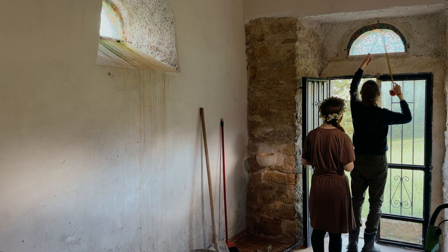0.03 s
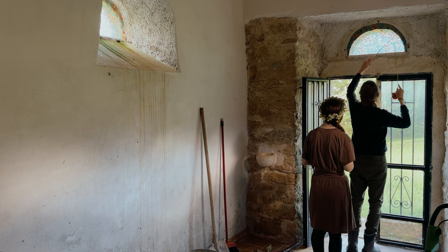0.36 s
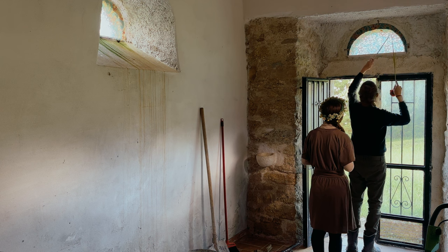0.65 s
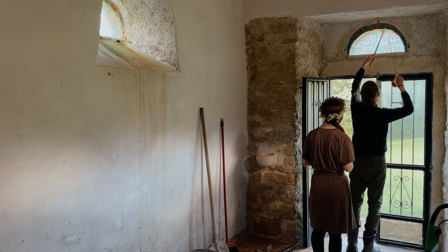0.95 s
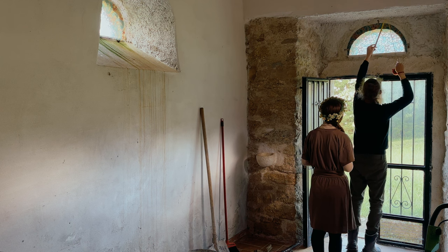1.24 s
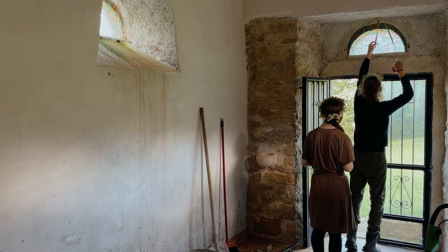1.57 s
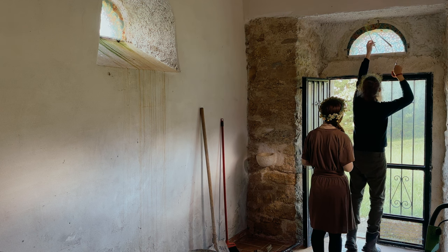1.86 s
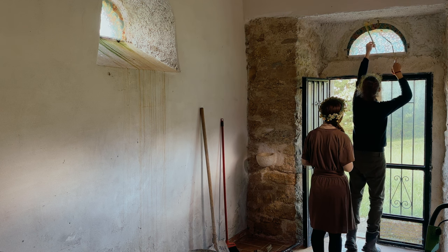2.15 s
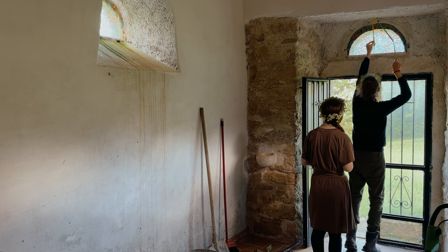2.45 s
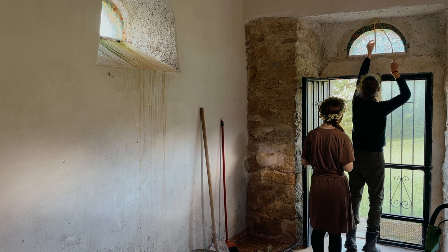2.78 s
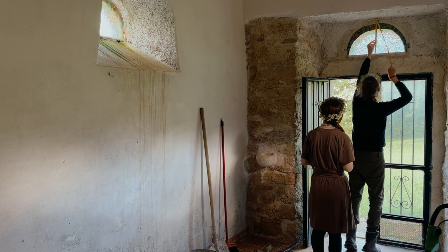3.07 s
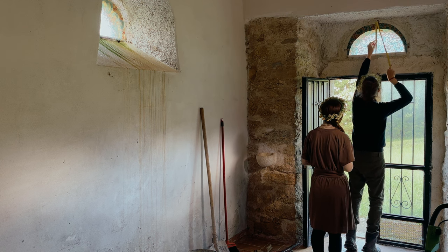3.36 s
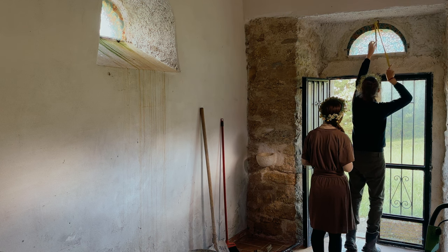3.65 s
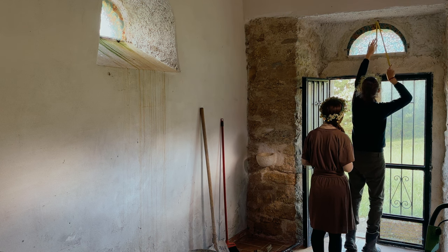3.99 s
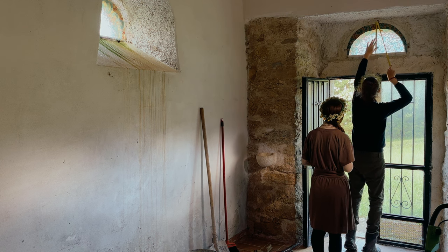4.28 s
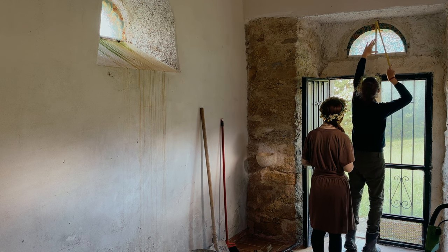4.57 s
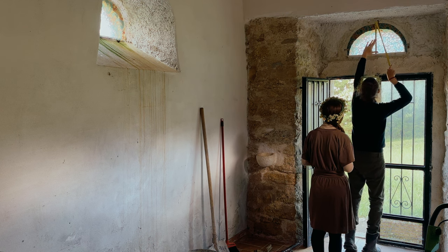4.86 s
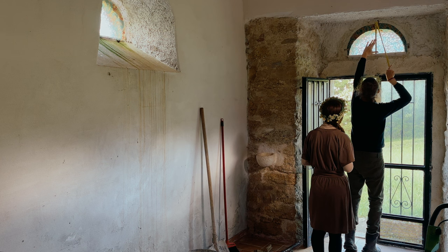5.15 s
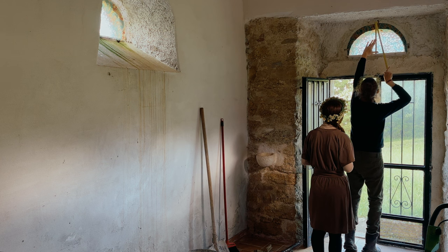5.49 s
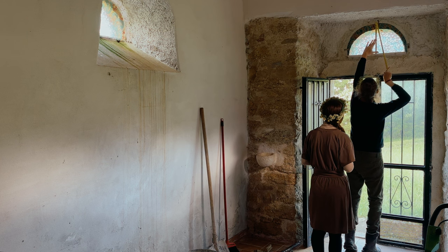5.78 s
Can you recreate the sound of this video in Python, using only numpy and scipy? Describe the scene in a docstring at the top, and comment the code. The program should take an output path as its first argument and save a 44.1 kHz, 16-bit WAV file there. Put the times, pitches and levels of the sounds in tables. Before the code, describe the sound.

A wooden folding ruler is swung open a few metres away in a bare, echoing stone room. Light rubs and ticks lead to several sharp snaps as its joints lock. It scrapes against a window frame, gives a brief high squeak and then taps the frame. Dull bumps make the room boom softly, and a shoe scuffs faintly near the end. Faint steady air with a thin hiss comes through an open door.

```python
"""Sharp wooden snaps, rubs and creaks echo round a bare stone room, with dull bumps and a thin squeak.
A few metres away, a wooden folding ruler is swung open and set against a window frame. Its joints snap
home and rub, its slats ring, and its tip taps and squeaks on the frame. The bumps make the room boom,
and near the end a shoe scuffs faintly twice.
Nearly everything arrives as echoes, over faint steady air from the open door."""
import sys
import numpy as np
from scipy import signal
from scipy.fft import rfft, irfft, next_fast_len
from scipy.io import wavfile
from scipy.ndimage import uniform_filter1d

SR = 44100
rng = np.random.default_rng(int(sys.argv[2]) if len(sys.argv) > 2 else 0)


def master(y):
    """Save y as 16-bit WAV."""
    cut = np.clip(np.atleast_2d(y).T, -1, 1)
    pcm = np.round(cut * 32767)  # scale
    wavfile.write(sys.argv[1], SR, pcm.astype(np.int16))


N = 265855
TIME = np.arange(N) / SR
LEAD = SR // 4   # samples before time zero, when the ruler is already moving

# The pitches at which the slats ring, and how strongly for each place they are struck:
# (pitch [Hz], width [Hz], outer joint [dB], inner joint [dB], middle joint [dB], tip [dB])
SLAT_TONES = [(246, 39, 2, -4, -6, -15.5), (484.3, 20, 3.5, -11.5, -4, -2), (634, 45, -11.5, 0, 2, -9.5),
              (1175, 86, 0, -15, -16.5, -3.5), (1287, 160, -17.5, -5.5, -15, -6),
              (1556, 80, 2.5, -13.5, -17, -19.5), (1918, 63, -10.5, 1.5, -19, -30.5),
              (2310, 44, -11.5, -1, -8, -12), (2617, 180, 5.5, -9.5, -17, -22),
              (2920, 120, -11, 0.5, -6, -14.5), (3400, 130, -12.5, -2, -4, -18.5),
              (3803, 140, 7, -7, -6.5, -14.5), (4004, 140, -4, -2.5, 0, -18),
              (4480, 200, -10, -6, -6, -18.5), (5116, 200, 2, -2.5, -4.5, -9),
              (5920, 540, -15.5, -9.5, -9, -10), (6530, 120, -7, -10, -8, -12),
              (7270, 160, -13, -11, -8.5, 4.5), (8740, 230, -9, -13.5, -16.5, -18.5)]
# How sound differs at the left and right microphone openings, which fall out of step in the high treble:
# (frequency [Hz], likeness [0-1], left ahead by [radians], left louder by [dB])
MIC_OPENINGS = [(45, 1, -1.5, 1), (130, 0.8, -1.5, 1), (455.52, 0.48, 0, 0.5), (1405.9, 0.17, 2.5, -1.5),
                (2930, .35, 1, 1.5), (4453.4, 0, 0.55, 3.5), (6150, 0, -1.5, 6.5), (7460, 0.5, 2.5, 7),
                (8412.4, 0.9, -.5, 1.5), (10380, 1, -1.5, 0), (9760, 1, -3, -1.5), (11940, 1, -4.5, 0),
                (12860, 0.1, -5.5, 0), (14430, .95, -12, 0.5)]


def from_db(db):
    """Turn decibels into a number to multiply by."""
    return 10 ** (np.asarray(db) / 20)


def rms_one(x):
    """Scale a sound so that its average strength (rms) is 1."""
    return x / np.sqrt(np.mean(x ** 2) + 1e-20)


def at_hz(points, hz, column=1):
    """Read a table between its rows, with every octave equally wide."""
    points = np.array(points, float)
    return np.interp(np.log(np.maximum(hz, 1)), np.log(points[:, 0]), points[:, column])


def coloured(x, points):
    """Shape a sound's tone with a curve of (frequency [Hz], level [dB])."""
    size = 4096
    gains = from_db(at_hz(points, np.fft.rfftfreq(size, 1 / SR)))
    cepstrum = irfft(np.log(gains))
    cepstrum[1:size // 2] *= 2   # minimum phase: the filter never rings ahead of the sound
    cepstrum[size // 2 + 1:] = 0
    return signal.fftconvolve(x, irfft(np.exp(rfft(cepstrum))))[:len(x)]


def resonance(x, hz, width_hz):
    """Ring at one pitch; the narrower the width, the longer the ring."""
    r = np.exp(-np.pi * width_hz / SR)
    feedback = [1, -2 * r * np.cos(2 * np.pi * hz / SR), r * r]
    return signal.lfilter(np.array([1, 0, -1]) * (1 - r * r) / 2, feedback, x + 1e-18)


def add(track, s, sound):
    """Mix a sound into a track, s seconds after time zero."""
    start = LEAD + round(s * SR)
    track[start:start + len(sound)] += sound[:len(track) - start]


def stroke(t, length, rise):
    """A push that builds over the share `rise` of its length and then eases off."""
    progress = t / max(length, .005)
    return np.clip(progress / max(rise, .01), 0, 1) * np.sqrt(np.clip(1 - progress, 0, 1))


def touch(x, body_db, top_db, edge_db):
    """Firm contacts bring out the wooden body, sharp ones the brassy edge and the highest treble."""
    low_db = body_db - 0.30453 * edge_db   # more edge thins the low wood tone
    return coloured(x, [(600, low_db), (1400, body_db), (4000, 0.00337), (5500, 0.012),
                        (9300, edge_db), (13000, top_db)])


def friction(push, bright_db, slips_per_s=1500, spread_db=3.0):
    """Sliding is many tiny slips of uneven size; a brighter slide has less body and more edge."""
    sizes = from_db(spread_db * np.minimum(rng.exponential(1, len(push)), 4))
    signs = rng.choice([-1, 1], len(push))
    slips = rms_one(sizes * signs * (rng.random(len(push)) < slips_per_s / SR))
    return touch(slips * push, body_db=-1.5 - 0.39 * bright_db, top_db=bright_db, edge_db=0.26 * bright_db)


def rubs(ring_db=-11.0):
    """The ruler slides on wood, on brass and through the fingers; the slips also make the slats ring."""
    # Slat rubbing on slat or frame, often just after a click; wood is below 0 in brightness, brass above:
    # (time [s], length [s], level [dB], brightness [dB])
    strokes = [(-0.07, 0.071, -33.5, -13.5), (0.125, 0.02, -34, 0.5), (0.85, 0.057, -46, 2),
               (1.066, 0.11, -55, 10.5), (1.363, 0.11, -53, -3.5), (1.487, 0.045, -33, 5.5),
               (1.97, 0.11, -34.5, 16.5), (2.168, 0.057, -32.5, -20), (2.419, 0.22, -33.5, 5),
               (2.76, 0.036, -24.5, -1.5), (3.034, 0.08, -34, 8), (3.145, 0.076, -32.5, 12.5),
               (3.441, 0.087, -38.5, 10.5), (3.565, 0.12, -34.5, 14), (3.795, .03, -52.5, 14),
               (3.894, 0.086, -29.5, 13.5), (4.111, 0.055, -32.5, 19), (4.27, .05, -39.5, 16.5),
               (4.445, 0.023, -32.5, 13.5), (4.669, 0.052, -45.5, 21.5), (4.848, 0.037, -50.5, -15.5)]
    # Faint sliding through the fingers: (time [s], level [dB])
    fingers = [(0.05, -49), (0.2, -61), (0.6, -68.5), (1.2, -67), (1.45, -52.5), (1.55, -50.5), (1.85, -49),
               (2.6, -57.5), (3.35, -62.5), (3.8, -47.5), (4.3, -47.5), (4.6, -66.5), (5.4, -75)]
    # The tone of all the rubbing: (frequency [Hz], level [dB])
    rub_tone = [(60, -13), (250, -4.5), (750, -4), (1250, 0.5), (1800, -3), (2500, 0.5), (3300, -3),
                (5000, -1.5), (7000, 0.5), (9500, -2.5), (13000, -12.5), (16000, -13)]
    out, t = np.zeros(LEAD + N), TIME[:SR // 3]
    for s, length, level_db, bright_db in strokes:
        add(out, s, friction(from_db(level_db) * stroke(t, length, rise=0.22), bright_db))
    finger_push = from_db(np.interp(TIME, *np.transpose(fingers)))
    add(out, 0, friction(finger_push, bright_db=-13.5, slips_per_s=350, spread_db=4.0))
    ring = sum(from_db(np.mean(dbs)) * resonance(out, hz, width) for hz, width, *dbs in SLAT_TONES)
    return 2 * coloured(out + from_db(ring_db) * ring, rub_tone)


def creaks_and_scuffs(slips_per_s=900, length_s=0.03, width_share=0.42):
    """A slat creaks or a shoe scuffs: quick uneven slips ring around one pitch."""
    # Short creaks of a slat gripping and, near the end, two faint shoe scuffs:
    # (time [s], level [dB], pitch [Hz])
    scrapes = [(-0.03, -36.5, 2250), (0.02, -42, 1230), (0.332, -52.5, 1150), (0.43, -50, 4300),
               (0.976, -45, 2250), (4.148, -38, 1084), (5.541, -54, 719), (5.698, -54, 724)]
    out, t = np.zeros(LEAD + N), TIME[:SR // 4]
    for s, level_db, hz in scrapes:
        slips = rng.standard_normal(len(t)) * (rng.random(len(t)) < slips_per_s / SR)
        width_hz = width_share * hz
        tone = rms_one(resonance(resonance(slips, hz, width_hz), hz, width_hz))
        add(out, s, from_db(level_db) * tone * stroke(t, length_s, rise=0.071))
    return out


def surrounding_noise(size):
    """Noise reaches the microphone from all sides: give its frequencies and left and right spectra."""
    hz = np.fft.rfftfreq(size, 1 / SR)
    left, other = rfft(rng.standard_normal((2, size)))
    alike = np.clip(at_hz(MIC_OPENINGS, hz), 0, .99)
    lag = np.exp(-1j * at_hz(MIC_OPENINGS, hz, column=2))
    right = alike * left * lag + np.sqrt(1 - alike ** 2) * other
    return hz, np.array([left, right])


def door_air(level_db=-64, band_hz=(4330, 5060), band_db=14.5):
    """Faint steady air comes through the open door with a narrow band of hiss, perhaps far insects."""
    # The tone of the air: (frequency [Hz], level [dB])
    air_tone = [(25, -15.5), (60, 0.5), (140, 4.5), (250, -0.5), (500, -4), (1000, -19), (1850, -20.5),
                (2700, -10), (3700, -17.5), (5400, -22.5), (7000, -20), (9500, -33.5), (12000, -26.5),
                (16000, -26)]
    size = next_fast_len(N)
    hz, noise = surrounding_noise(size)
    air = rms_one(irfft(noise * from_db(at_hz(air_tone, hz)), size)[:, :N])
    band_filter = signal.butter(6, band_hz, "band", fs=SR, output="sos")
    hiss = signal.sosfilt(band_filter, air[:, ::-1])   # played backwards, the air acts as fresh noise
    return from_db(level_db) * (air + from_db(band_db) * hiss)


def colourless(x):
    """Even out the tone of a short rattle, so that only the thing it strikes gives it pitch."""
    size = 4096
    power = uniform_filter1d(np.abs(rfft(x, size)) ** 2, size=5)
    correction_db = -10 * np.log10(power + 1e-9)
    return coloured(x, np.c_[np.fft.rfftfreq(size, 1 / SR), correction_db][1:])


def clicks(rattle_s=0.0028, halving_db=19.5, detune=0.0016):
    """A joint snaps home or the tip taps: a blow and a tiny rattle crack and set the slats ringing."""
    # Snaps and taps: (time [s], level [dB], wooden body [dB], brassy edge [dB], highest treble [dB],
    # slat ring [dB], place struck [name])
    hits = [(0.433, -45, -10.5, -18, -8, -2, "middle"), (0.917, -49, 6.5, -4, -17, -2, "inner"),
            (1.432, -34, -6, 4, 4.5, 0, "inner"), (1.688, -37.5, -6.5, 3, -3.5, 4, "inner"),
            (1.757, -39.5, 1, 11.5, 1.5, -2.5, "tip"), (1.943, -17, 0.5, 2.5, 9.5, 8, "outer"),
            (2.391, -10.5, -1, -5.5, 5, 8, "inner"), (2.703, -25, -3, -9, -6, 4.5, "middle"),
            (2.886, -39.5, 4, -13, -23.5, 1, "inner"), (3.007, -29, -3.5, 4, 3.5, -6, "inner"),
            (3.117, -28, -10.5, 9, 2, -0.5, "tip"), (3.513, -18.5, -3, -3, -3, 2.5, "middle"),
            (4.681, -50, -16, 14, -3, -2, "inner"), (5.014, -22.5, -4, -0.5, 1.5, 10, "tip"),
            (5.232, -43, 5, -2, -1.5, -14, "tip"), (5.704, -58.5, 5.5, -4.5, 2, 2, "tip")]
    # Names of the places struck, in the order of the last four columns of SLAT_TONES
    places = ["outer", "inner", "middle", "tip"]
    # The tone of the bare crack: (frequency [Hz], level [dB])
    crack_tone = [(60, -17.5), (200, -22.5), (600, -7), (1100, -3.5), (2000, -7), (3500, -5.5), (6500, -2),
                  (9000, 0.5), (13000, -10), (16000, -8.5)]
    out, t = np.zeros(LEAD + N), TIME[:SR // 4]
    blow = 1.0 * (t == 0)
    for s, level_db, body_db, edge_db, top_db, ring_db, place in hits:
        fade_s = max(rattle_s * .5 ** (edge_db / halving_db), .0005)   # sharper hits rattle more briefly
        rattle = rng.standard_normal(len(t)) * np.exp(-t / fade_s)
        force = colourless(blow + rattle / np.linalg.norm(rattle))
        grip = 1 + detune * rng.standard_normal()   # the hands shift the pitches a little each time
        ring = sum(from_db(dbs[places.index(place)]) * resonance(force, hz * grip, width)
                   for hz, width, *dbs in SLAT_TONES)
        snap = rms_one(coloured(force, crack_tone) + from_db(ring_db) * ring) / 2
        add(out, s, from_db(level_db) * touch(snap, body_db, top_db, edge_db))
    return out


def bumps():
    """Hard snaps and soft bumps, probably hands on the frame and shifting feet, make the room boom."""
    # Dull bumps: (time [s], length [s], level [dB], strongest pitch [Hz],
    # level at a third of that pitch [dB], level at three times that pitch [dB])
    knocks = [(1.578, 0.12, -39, 162, -6, -24.5), (1.944, 0.045, -33.5, 137, -6, -11),
              (2.395, 0.063, -33, 222, -7.5, -17.5), (2.678, 0.36, -44.5, 150, -2.5, -19),
              (3.546, 0.086, -31.5, 174, -5, -19), (3.878, 0.43, -48.5, 137, 0, -8.5),
              (4.333, 0.15, -35, 120, -12, -15.5), (5.018, 0.054, -39, 106, -31, -24.5),
              (5.554, 0.081, -42.5, 116, -28, -16)]
    # The low pitches at which the room rings: (pitch [Hz], width [Hz], level [dB])
    room_tones = [(35.7, 6, -12), (70, 5, 6), (90, 10, -5), (116, 8.3, -2.5), (134, 14, -2.5), (150, 18, 2),
                  (180.4, 15, 5.5), (205, 18, -5), (254, 26, 1.5), (288, 18, -1.5)]
    # The tone of the bare thud: (frequency [Hz], level [dB])
    thud_tone = [(20, -29), (50, -21), (110, -6.5), (220, -14.5), (350, -5), (700, -6.5), (1500, -42),
                 (4000, -62)]
    out, t = np.zeros(LEAD + N), TIME[:SR]
    for s, length, level_db, hz, deep_db, upper_db in knocks:
        push = rng.standard_normal(len(t)) * stroke(t, length, rise=0.12)
        push = coloured(push, [(hz / 3, deep_db), (hz, 0), (hz * 3, upper_db)])
        boom = sum(from_db(db) * resonance(push, pitch, width) for pitch, width, db in room_tones)
        bump = rms_one(coloured(push, thud_tone) + boom)
        add(out, s, from_db(level_db) * np.sqrt(length) * bump)
    return out


def squeaks(start_hz=6123, rise_hz=65, waver_hz=18, octave_db=-7.0):
    """The tip sticks and slips thousands of times a second, making brief rising, wavering whistles."""
    # Skids of the tip on the frame: (time [s], length [s], level [dB])
    skids = [(4.291, 0.014, -5.5), (4.325, 0.058, -30), (4.448, 0.018, -37)]
    out, t = np.zeros(LEAD + N), TIME[:SR // 4]
    for s, length, level_db in skids:
        waver = rms_one(uniform_filter1d(rng.standard_normal(len(t)), size=70))
        pitch_hz = start_hz + rise_hz * t / length + waver_hz * waver
        phase = 2 * np.pi * np.cumsum(pitch_hz) / SR
        whistle = np.sin(phase) + from_db(octave_db) * np.sin(2 * phase)
        add(out, s, from_db(level_db) * stroke(t, length, rise=0.18) * whistle)
    return out


def evened(echoes):
    """Many crossing echoes treat nearby pitches about alike, so smooth out narrow humps in their tone."""
    power = np.sum(np.abs(rfft(echoes)) ** 2, axis=0)
    humps_db = 10 * np.log10(uniform_filter1d(power, size=60) / uniform_filter1d(power, size=900))
    points = np.c_[np.fft.rfftfreq(echoes.shape[1], 1 / SR), -humps_db][1:]
    return np.array([coloured(channel, points) for channel in echoes])


def room(x, early_db=5.0, early_s=0.0098, early_width_s=0.003, build_s=0.0027, gain_db=-37.5):
    """The window recess throws back a tight bunch of echoes; the room rings on, longest in the bass."""
    # How long the stone room rings: (frequency [Hz], time to fade by 60 dB [s])
    fade_times = [(60, 0.98), (250, 0.98), (700, 0.82), (1840, 0.7), (4850, 0.59), (8000, 0.46),
                  (13000, 0.1873), (16000, 0.15)]
    t = TIME[:SR * 3 // 2]
    hz, noise = surrounding_noise(len(t))
    left_louder_db = at_hz(MIC_OPENINGS, hz, column=3)
    noise = noise * from_db([left_louder_db / 2, -left_louder_db / 2])
    centres_hz = np.geomspace(50, 16000, 18)
    tail = 0
    for centre, share in zip(centres_hz, np.eye(len(centres_hz))):
        band = irfft(noise * at_hz(np.c_[centres_hz, share], hz), len(t))
        tail = tail + band * np.exp(-np.log(1000) * t / at_hz(fade_times, centre))
    early_boost = from_db(early_db * np.exp(-.5 * ((t - early_s) / early_width_s) ** 2))
    build_up = np.clip(.1 + t / build_s, 0, 1)
    echoes = from_db(gain_db) * tail * early_boost * build_up
    return signal.fftconvolve(x[None], evened(echoes), axes=1)


def scene():
    """All the movement is heard through the room, over the air from the door."""
    movement = clicks() + rubs() + creaks_and_scuffs() + squeaks() + bumps()
    return room(movement)[:, LEAD:LEAD + N] + door_air()


def record(dry):
    """Cut the deepest rumble and the very highest treble."""
    low_hz, high_hz = 42, 16100
    heard = signal.sosfilt(signal.butter(8, low_hz, "high", fs=SR, output="sos"), dry)
    return signal.sosfilt(signal.ellip(10, .2, 80, high_hz, fs=SR, output="sos"), heard)


dry = scene()
out = record(dry)
master(out)
```